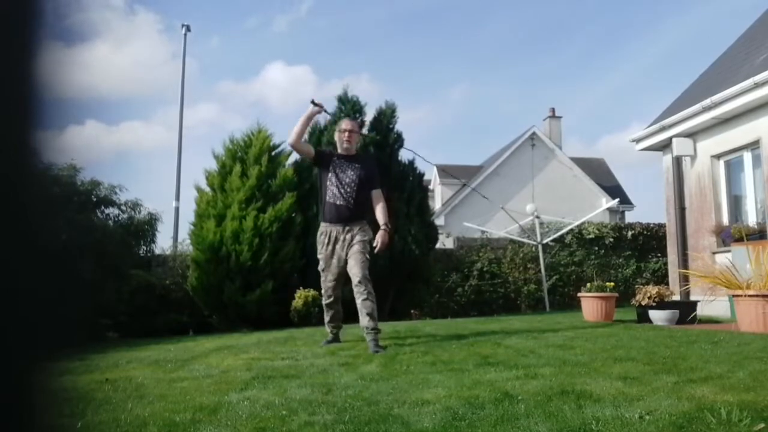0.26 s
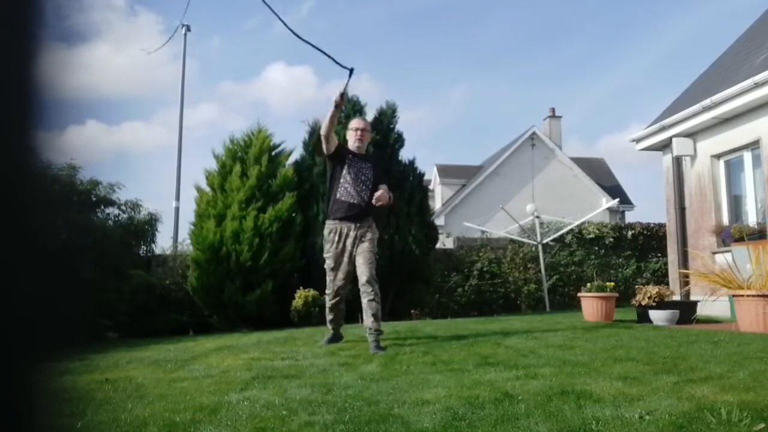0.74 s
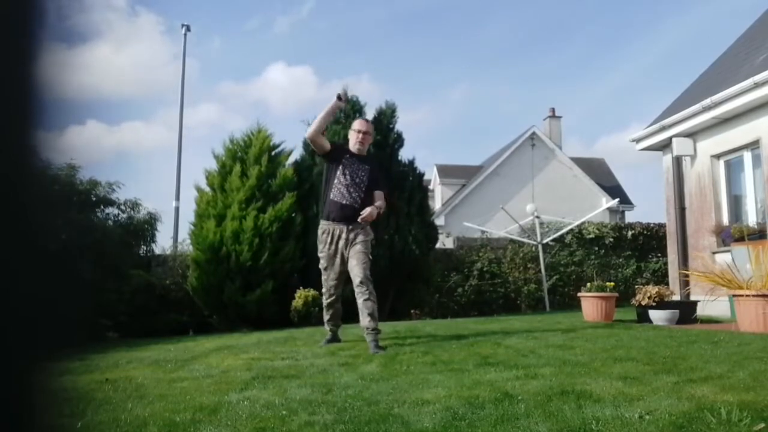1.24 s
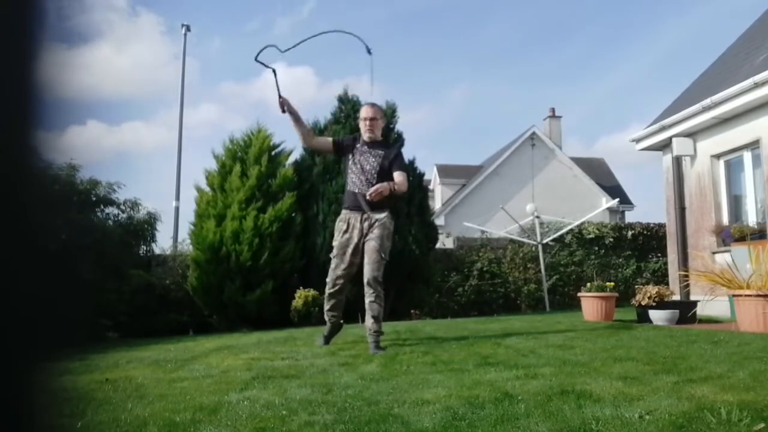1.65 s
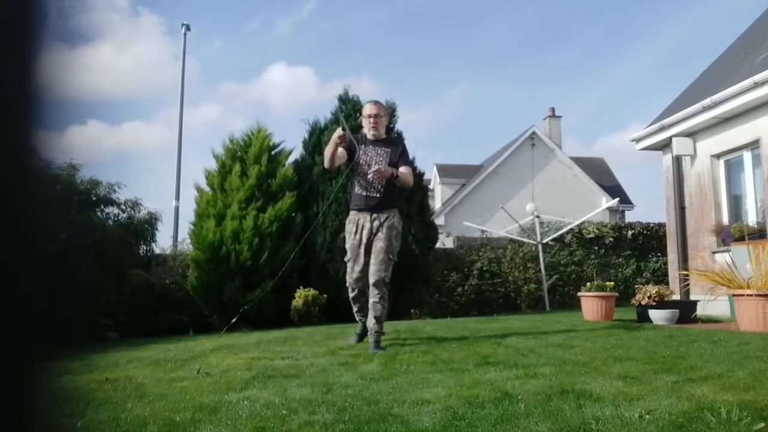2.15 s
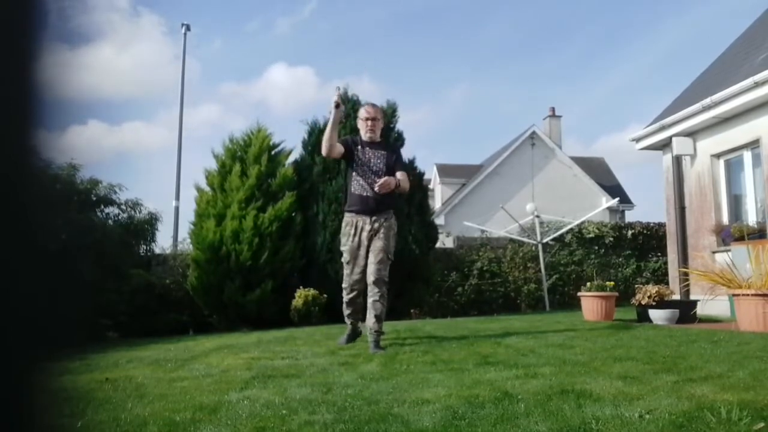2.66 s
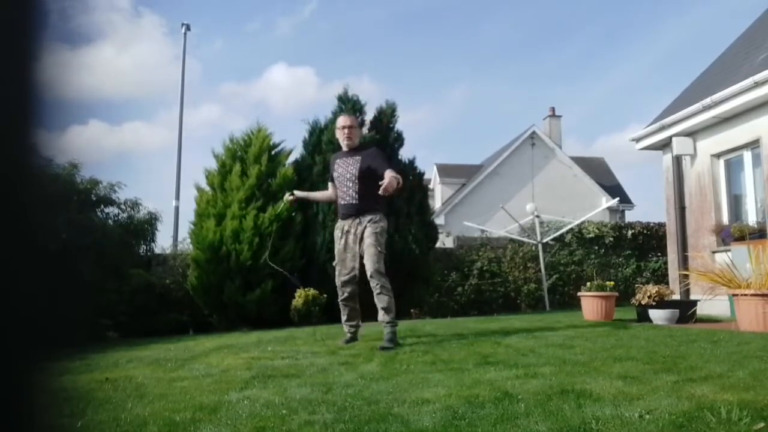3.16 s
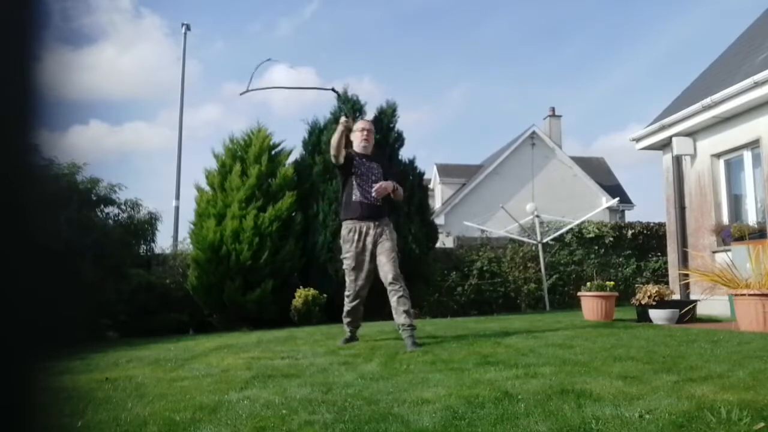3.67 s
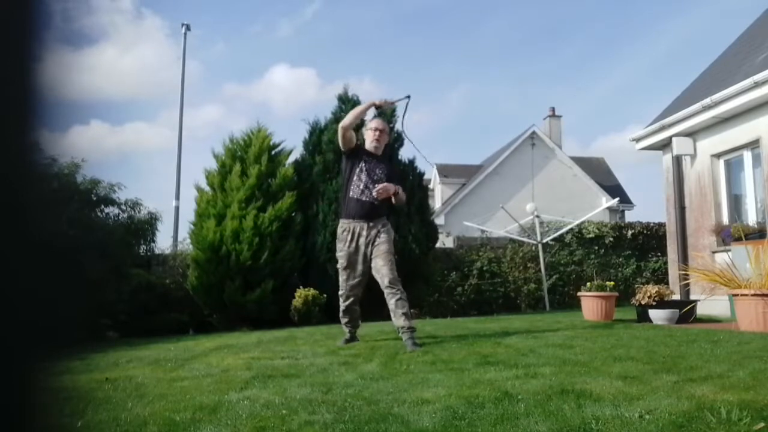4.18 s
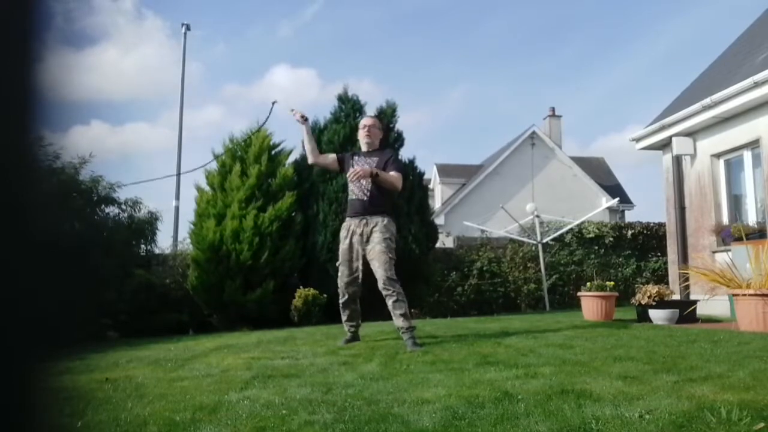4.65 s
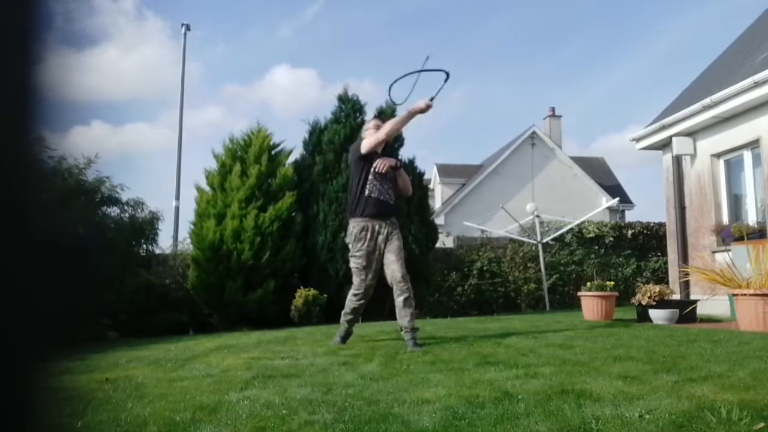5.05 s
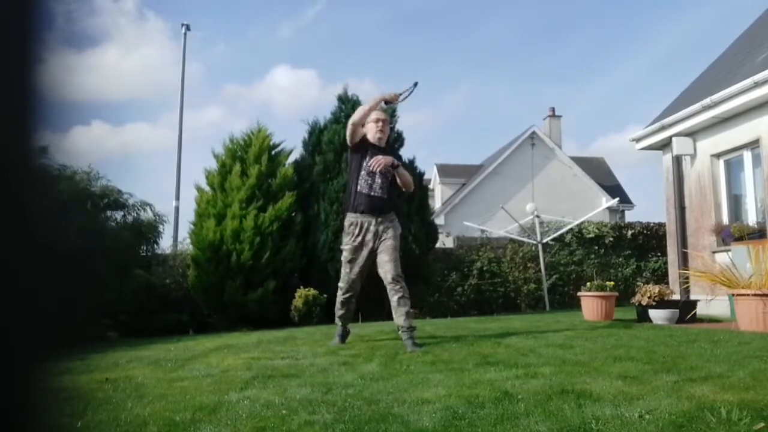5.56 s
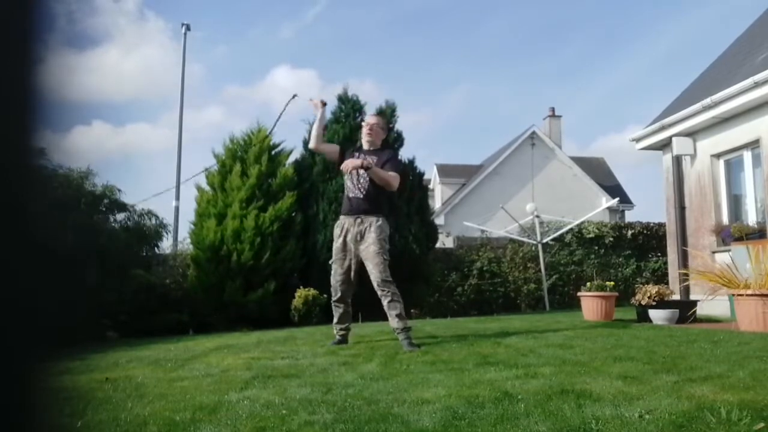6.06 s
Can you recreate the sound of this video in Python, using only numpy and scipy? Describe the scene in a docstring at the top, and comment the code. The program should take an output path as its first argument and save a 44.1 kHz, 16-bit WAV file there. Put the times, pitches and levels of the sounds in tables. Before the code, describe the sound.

A leather whip swishes and cracks sharply again and again in a garden, with slapback off house walls and low wind buffeting the microphone.

```python
"""First a faint snap of a leather whip and gusts of wind, then ever more strokes on a lawn beside a house.
Each stroke is noise that swells to the snap, then fades as the garden scatters it back; each snap is
a short shock with a flutter of noise, returned by four walls. Wind is a crowd of short pressure swings
that thump the two microphone ports. Filtered noise makes the leaves, a far drone and brief puffs;
gliding sines make the low singing of the lash and a small bird."""
import sys
import numpy as np
from scipy import signal
from scipy.fft import rfft, irfft, next_fast_len
from scipy.io import wavfile
from scipy.ndimage import uniform_filter1d, map_coordinates

SR = 44100
rng = np.random.default_rng(int(sys.argv[2]) if len(sys.argv) > 2 else 0)


def unload_wav(signal):
    """Save mono or channel-first audio to the path in sys.argv[1] as 16-bit WAV at rate SR, clipped to [-1, 1]."""
    wavfile.write(
        sys.argv[1],
        SR,
        np.round(np.clip(np.atleast_2d(signal).T, -1, 1) * 32767).astype(np.int16),
    )


N = 278446  # length in samples


def amp(db):
    """Turn dB into a plain factor."""
    return 10 ** (np.asarray(db) / 20)


def unit(x):
    """Scale each channel to an rms of 1."""
    return x / np.sqrt(np.mean(x ** 2, axis=-1, keepdims=True) + 1e-20)


def along(points, hz):
    """Read a curve of (Hz, value) points on a log-frequency axis."""
    f, v = np.transpose(points)
    return np.interp(np.log(hz + 1), np.log(f + 1), v)


def curves(rows):
    """One value per sample for each column after the time."""
    s, *columns = np.transpose(rows)
    return np.array([np.interp(np.arange(N) / SR, s, c) for c in columns])


def wobble(rate):
    """A smooth random curve for each port, with rate knots a second."""
    knots = rng.standard_normal((2, int(N * rate / SR) + 4))
    return np.array([map_coordinates(k, [np.arange(N) * rate / SR]) for k in knots])


def filtered(x, response):
    """Filter x by a response given as a function of frequency in Hz."""
    m = next_fast_len(x.shape[-1] + 8192)
    spectrum = rfft(x, m) * response(np.fft.rfftfreq(m, 1 / SR))
    return irfft(spectrum, m)[..., :x.shape[-1]]


def without_bass(x, corner_hz):
    """Weaken everything below the corner."""
    return filtered(x, lambda f: f ** 2 / (f ** 2 + corner_hz ** 2))


def bell(hz, centre_hz, octaves):
    """A bump of height 1 on the log-frequency axis."""
    return np.exp(-.5 * (np.log2((hz + 1) / centre_hz) / octaves) ** 2)


def add(track, s, piece):
    """Mix a piece in from time s; the track starts half a second early."""
    at = round((s + .5) * SR)
    track[..., at:at + piece.shape[-1]] += piece


def trimmed(track):
    """Drop the early half second and everything after the end."""
    return track[:, SR // 2:][:, :N]


# Steady far drone. Each row: pitch in Hz, width in Hz, level in dB.
HUMS = [(138.7, 75, -68.5), (223.4, 13, -67.5), (339, 6.7, -81.5)]


def drone():
    """Narrow bands of noise hum far away, each wavering a little in level."""
    total = 0
    for hz, width, db in HUMS:
        band = filtered(rng.standard_normal(N), lambda f: 1 / (1 + (2 * (f - hz) / width) ** 2))
        total = total + amp(db + 0.5 * wobble(25)[0]) * unit(band)
    return total


# Loudness of leaves and lash in the air. Each row: time in seconds, level in dB, left minus right in dB.
AIR = [(0.0, -74.5, -4.5), (0.45, -76.5, -3.5), (0.91, -67, -3), (1.07, -74.5, -2.5), (1.37, -75, -7.5),
       (1.67, -69.5, -0.5), (1.85, -76.5, 4.5), (2.24, -61.5, -8), (2.46, -78.5, -13), (2.85, -73, -5),
       (3.35, -75.5, 2.5), (4.04, -71, -1.5), (4.66, -72.5, 2), (5.36, -68.5, 1.5), (5.73, -72, 0.5),
       (6.1, -69, 7), (6.31, -74.5, -0.5)]
# Colour of that hiss. Each row: frequency in Hz, relative level in dB per Hz.
LEAF_COLOUR = [(180, -21.5), (300, -6), (580, -9), (1000, -11), (3000, -21), (4100, -23.5), (5200, -20),
               (7500, -23), (10700, -29), (13000, -33.5), (14800, -25), (16000, -36)]


def leaves():
    """Leaves and lash hiss as coloured noise, alike at both ports only in the bass."""
    air_db, pan_db = curves(AIR)

    def mid_and_side(f):
        likeness = along([(300, 0.85), (1400, 0.063), (3000, 0.019)], f)
        angle = np.arccos(likeness) / 2
        return amp(along(LEAF_COLOUR, f)) * [np.cos(angle), np.sin(angle)]

    mid, side = filtered(rng.standard_normal((2, N)), mid_and_side)
    level_db = air_db + np.outer([.5, -.5], pan_db) + .8 * wobble(8.5)
    return amp(level_db) * unit(np.array([mid + side, mid - side]))


# Single strong eddies. Each row: time in seconds, port (0 left, 1 right), strength in dB, size in ms.
THUMPS = [(0.163, 1, -27.5, 1.9), (0.25, 1, -25.5, 1.9), (0.351, 1, -18, 2), (0.503, 1, -25.5, 2.2),
          (0.598, 1, -21.5, 3.8), (0.663, 1, -18, 2.4), (0.759, 1, -19, 3.4), (0.811, 1, -22.5, 1.26),
          (0.898, 1, -27, 0.84), (1.23, 0, -25, 2.4), (1.429, 0, -26.5, 3), (1.556, 0, -33.5, 0.82),
          (1.616, 0, -21.5, 1.18), (1.669, 0, -22.5, 1.3), (1.941, 1, -17, 1.03), (1.976, 1, -16.5, 1.02),
          (2.043, 1, -13.5, 2.1), (2.11, 1, -12, 1.5), (2.264, 1, -21, 1.86), (2.375, 1, -16.5, 0.7),
          (2.458, 1, -17, 0.71), (2.496, 1, -18.5, 0.94), (2.517, 1, -16, 0.68), (2.56, 1, -10, 0.71),
          (2.614, 1, -5, 0.52), (2.629, 1, -17, 0.32), (2.661, 1, -6.5, 0.53), (2.671, 1, -5.5, 0.84),
          (2.696, 1, -3, 2.1), (2.718, 1, -8, 0.46), (2.768, 1, -21.5, 0.61), (2.81, 1, -24, 0.56),
          (2.832, 1, -18, 0.68), (2.874, 1, -18, 1.14), (2.912, 1, -5.5, 1.9), (2.957, 1, -10, 1.43),
          (3.029, 1, -15, 0.62), (3.255, 1, -30, 0.77), (3.371, 1, -22.5, 1.05), (3.501, 1, -14.5, 0.81),
          (3.588, 1, -22.5, 0.67), (3.71, 1, -24.5, 0.98), (3.799, 1, -18.5, 1.35), (4.105, 0, -19.5, 1.98),
          (4.329, 0, -20, 1.62), (4.499, 0, -11.5, 1.76), (4.811, 0, -25.5, 2.4), (5.233, 0, -28.5, 2.3),
          (5.657, 0, -25, 1.9), (5.72, 0, -29, 0.75), (5.791, 0, -28.5, 0.97), (6.007, 0, -15.5, 1.47),
          (6.267, 0, -26, 2.4)]
# Wind at the left port. Each row: time in seconds, level in dB.
WIND_LEFT = [(0.02, -76.5), (0.22, -62), (0.7, -58), (0.84, -48), (1.02, -71), (1.2, -48), (1.62, -36),
             (1.82, -53.5), (1.93, -33), (2.12, -31.5), (2.22, -61), (2.32, -44), (2.5, -51), (2.72, -35.5),
             (3.05, -51), (3.42, -41), (3.65, -49.5), (4.0, -55.5), (4.12, -31.5), (4.22, -49),
             (4.32, -35.5), (4.42, -43.5), (4.52, -29), (4.63, -41), (4.85, -39), (5.08, -66),
             (5.23, -41.5), (5.45, -60), (5.7, -30), (6.0, -38.5), (6.14, -49), (6.32, -35.5)]
# Wind at the right port. Each row: time in seconds, level in dB.
WIND_RIGHT = [(0.02, -54.5), (0.24, -36.5), (0.44, -36), (0.52, -44.5), (0.62, -36.5), (0.92, -32),
              (1.02, -56), (1.3, -51.5), (1.42, -43), (1.6, -51), (1.95, -28), (2.12, -30.5), (2.22, -47.5),
              (2.36, -27.5), (2.62, -15.5), (2.8, -26.5), (2.92, -20), (3.08, -31.5), (3.22, -33),
              (3.32, -43), (3.42, -32.5), (3.82, -36), (4.0, -50), (4.5, -61), (5.1, -63), (5.32, -47),
              (5.5, -63.5), (6.0, -57), (6.22, -45)]


def eddies(s, size_ms, gain, turn, cycles):
    """Short pressure swings, each a cosine that swells and dies, summed into one port."""
    t = np.arange(-500, 500)  # samples
    u = t / (size_ms[:, None] * SR / 1000)
    swell = gain[:, None] * np.hanning(len(t)) / np.cosh(0.98 * u)
    swing = swell * np.cos(cycles * u + turn[:, None])
    at = np.round(s * SR).astype(int)[:, None] + t + 500
    return np.bincount(at.ravel(), swing.ravel(), N + 1000)[500:][:N]


def wind():
    """Eddies tumble over each port on its own; stronger wind makes them smaller, so brighter."""
    out = np.zeros((2, N))
    level_db = np.concatenate([curves(WIND_LEFT), curves(WIND_RIGHT)])
    s, port, db, size = np.transpose(THUMPS)
    turns = rng.uniform(0, 2 * np.pi, len(s))
    rumble = unit(filtered(rng.standard_normal((2, N)), lambda f: bell(f, 86, 0.78)))
    lumps = amp(2.4 * wobble(25) + 1.5 * wobble(9))  # the tumbling comes in clusters
    for k in range(2):
        when, spread, strength, turn = rng.random((4, 4200))
        speed = amp(0.37 * (level_db[k][(when * (N - 1)).astype(int)] + 38.5))
        scale = np.clip((1.07 + 6 * spread ** 1.47) / speed, .33, 4.5)  # ms
        gain = amp(9.6 * strength) * scale ** -.3
        tumble = eddies(when * (N - 1) / SR, scale, gain, 2 * np.pi * turn, cycles=0.98)
        rumble_gain = amp(-8.0 - 0.04 * (level_db[k] + 39.5))  # its share shrinks in strong wind
        blend = unit(lumps[k] * unit(tumble) + rumble_gain * rumble[k])
        mine = np.round(port) == k
        thumps = eddies(s[mine], size[mine], amp(db[mine]), turns[mine], cycles=1.227)
        out[k] = amp(level_db[k]) * blend + thumps
    return without_bass(out, 22)


# Brief puffs of coloured noise: brushes, thuds, whistling and bodies of strokes, an echo.
# Each row: time in seconds, centre in Hz, width in octaves, length in ms, left level in dB, right level in dB.
PUFFS = [(0.689, 1090, 1.4, 5.6, -71, -70), (.76, 780, 0.74, 59, -77, -73),
         (.915, 1200, 1.9, 5.5, -66, -50), (0.931, 3010, 0.32, 3.4, -58, -33),
         (1.68, 740, 1.34, 39, -61, -65), (1.68, 5560, 1.4, 45, -72, -76),
         (1.71, 513, 0.48, 34, -55.5, -56), (1.762, 3060, 0.29, 2.2, -41, -45),
         (1.772, 507, 1.3, 4.2, -32, -25.5), (1.799, 1900, .5, 1.5, -32, -23.5),
         (2.023, 2500, 0.85, 17, -62.5, -66), (3.116, 1300, .9, 2.5, -43, -37.5),
         (3.466, 9000, 2.3, 14, -72.5, -74.5), (3.609, 2770, 0.5, 19, -69.5, -79),
         (3.924, 3300, 2.7, 9.5, -50.5, -53), (3.945, 6360, 0.29, 3.2, -32.5, -46),
         (4.47, 2100, 0.63, 17, -69, -70.5), (4.697, 980, 2.2, 3.4, -48, -58),
         (5.298, 600, 1.07, 2.4, -25.5, -36)]


def puffs():
    """Brief puffs of coloured noise swell and fade, partly alike at both ports."""
    out = np.zeros((2, N + 2 * SR))
    t = np.arange(-SR // 4, SR // 4) / SR
    for s, hz, octaves, ms, left_db, right_db in PUFFS:
        noise = rng.standard_normal((2, len(t))) + 1.3 * rng.standard_normal(len(t))
        puff = unit(filtered(noise, lambda f: bell(f, hz, octaves / 2)))
        envelope = np.exp(-.5 * (t / (ms / 1000)) ** 2)
        add(out, s - 1 / 4, amp([[left_db], [right_db]]) * puff * envelope)
    return trimmed(out)


# Gliding tones, the lash singing low and the bird high. Each row: start in seconds, length in seconds,
# first, middle and last pitch in Hz, left level in dB, right level in dB.
TONES = [(4.394, 0.045, 707, 600, 559, -57, -54.5), (4.456, 0.057, 776, 756, 720, -62.5, -56.5),
         (4.907, 0.028, 6800, 6880, 6860, -77, -84), (5.097, 0.038, 7250, 7270, 7300, -73, -84),
         (5.505, 0.03, 6900, 7030, 6900, -78, -83.5), (5.79, 0.037, 6400, 6800, 6300, -75, -83),
         (5.817, 0.026, 6300, 6550, 7360, -76, -82)]


def gliding_tones():
    """The lash and the bird sound as thin sines that bend through three pitches."""
    out = np.zeros((2, N + 2 * SR))
    for s, length, first, middle, last, left_db, right_db in TONES:
        u = np.linspace(0, 1, round(length * SR))
        # a parabola through the three pitches
        pitch = first * (1 - u) * (1 - 2 * u) + 4 * middle * u * (1 - u) + last * u * (2 * u - 1)
        pitch = pitch + 1800 * uniform_filter1d(rng.standard_normal(len(u)), size=300)  # unsteady in the wind
        envelope = np.sqrt(np.sin(np.pi * u) ** 2)
        tone = envelope * np.sin(2 * np.pi * np.cumsum(pitch) / SR)
        add(out, s, amp([[left_db], [right_db]]) * tone)
    return trimmed(out)


# Strokes of the lash. Each row: time of the snap in seconds, rise in ms per 20 dB, hold in ms,
# left and right level in dB, bass in dB, left and right ring in dB, top in dB, tail stretch as a factor.
STROKES = [(-.02, 20, 3.7, -43, -39, -13, 3, 3.5, -3.5, 1.04),
           (0.928, 28, 2.4, -39, -32.5, -2.5, 1.5, 0.5, -3.5, 0.86),
           (1.772, 24, 8.7, -31, -29.5, 1.5, 0.5, -7, -6, 0.93),
           (2.119, 6, 29, -40.5, -31, -11, -1.5, -1.5, -15, 1.15),
           (2.341, 33, 3.2, -45, -42, 7.5, -0.5, 3.5, 1, 1.21),
           (3.098, 14.5, 21.2, -38, -36, -9.5, -9.5, -9, -9.5, 1.29),
           (3.939, 12.5, 18, -34.5, -35, -3, 3, 1, -6.5, 0.97),
           (4.637, 4.5, 31.4, -41.5, -45, -10.5, 1.5, 4, 1.5, 1),
           (5.297, 11, 12.3, -32.5, -32, -8.5, 1, -5, -5.5, 0.95),
           (6.012, 9, 30.6, -32, -36.5, -10, -7, -14, -13, 1.19)]
# Fading of the garden before the tail stretch. Each row: frequency in Hz, time to fall 60 dB in seconds.
GARDEN = [(400, 0.32), (1000, 0.29), (2800, .34), (7000, 0.22), (14000, 0.18)]
# Microphone colour, also heard in the snaps. Each row: frequency in Hz, gain in dB.
PORTS = [(200, -4.5), (600, 10.5), (1500, 0.5), (3000, -3), (4000, -7), (5200, -2), (8000, -5),
         (11000, -7.5), (13000, -14), (14800, -7), (16000, -22.5)]
RING_HZ, RING_WIDTH_HZ = 6800, 1400  # pitch that some strokes favour
# Late answer of farther houses: level under the stroke, time to fall 60 dB, favoured pitch.
FAR_DB, FAR_T60_S, FAR_HZ = -20.5, .6, 2200


def strokes():
    """The lash hisses ever louder up to the snap; the garden scatters it back, treble dying first."""
    out = np.zeros((2, N + 2 * SR))
    for s, rise, hold, left_db, right_db, bass_db, ring_l_db, ring_r_db, top_db, stretch in STROKES:
        hz, t, z = signal.stft(rng.standard_normal((2, SR * 3 // 4)), SR, nperseg=128)
        t = t - 1 / 4  # the snap is at 0
        t60 = stretch * along(GARDEN, hz)[:, None]
        rise_db = 20 * np.minimum(t, 0) / (rise / 1000)
        shape_db = rise_db - 60 * np.maximum(t - hold / 1000, 0) / t60
        tilt_db = along([(900, bass_db), (2000, 0), (8000, 0.0083), (11000, top_db)], hz)
        ring_shape = np.exp(-.5 * ((hz - RING_HZ) / RING_WIDTH_HZ) ** 2)
        ring_db = np.array([[ring_l_db], [ring_r_db]]) * ring_shape
        far = amp(FAR_DB - 60 * t / FAR_T60_S) * (t > hold / 1000) * bell(hz, FAR_HZ, 1.1)[:, None]
        # the noise is uneven, in random patches of time and pitch
        patches = uniform_filter1d(rng.standard_normal(z.shape), size=3, axis=1)
        patches = uniform_filter1d(patches, size=3, axis=2)
        clumps_db = 3 * unit(patches) + 1.3 * rng.standard_normal((2, 1, len(t)))
        # lower tones reach both ports more alike
        shared = along([(600, 0.28), (1500, 0.13), (4000, 0.041)], hz)[:, None]
        z[1] = np.sqrt(shared) * z[0] + np.sqrt(1 - shared) * z[1]
        colour_db = along(PORTS, hz) + tilt_db + ring_db + np.array([[left_db], [right_db]])
        z = z * amp(colour_db[..., None] + clumps_db) * np.hypot(amp(shape_db), far)
        add(out, s - 1 / 4, without_bass(signal.istft(z, SR, nperseg=128)[1], 330))
    return trimmed(out)


# Snaps of the tip and their strongest single echoes. Each row: time in seconds,
# left and right shock level in dB, lag of the left in ms, shock width in ms, flutter in dB, echo in dB.
CRACKS = [(0.0096, -35.5, -35.5, -0.082, 0.068, 9.5, -6), (0.9166, -36, -31, -0.067, 0.17, 10, -6),
          (0.9315, -22.5, -14, -0.019, 0.052, -8.5, -1), (0.9419, -19.5, -19.5, 0.14, 0.12, 0, -14),
          (0.9528, -25, -12.5, 0.23, 0.047, -21, -24), (1.7623, -17, -27, 0.17, 0.16, -7, 0),
          (1.772, -28.5, -25.5, 0.13, 0.085, 13, -6), (1.798, -32, -25.5, 0.051, 0.23, -6, 6),
          (2.0027, -41, -36.5, 0.1, 0.077, -27, -2), (2.121, -13.5, -6.5, -0.071, 0.046, -9.5, -3),
          (2.1449, -27.5, -17, 0.23, 0.091, 4, 4), (2.2117, -32, -24, -0.21, 0.064, -17, -7),
          (2.3415, -16.5, -9.5, -0.26, 0.074, -6, -8), (3.1, -2, -0.5, -0.04, 0.1, -8, -4),
          (3.4142, -53, -61, 0.001, 0.034, -1, -9), (3.939, -16.5, -35, 0.075, 0.045, -4, -5),
          (3.944, -24.5, -35, 0.34, 0.048, 4, -6), (3.948, -24.5, -28, -0.15, 0.12, 3, 10),
          (4.6384, -14.5, -17.5, -0.12, 0.037, -4, 0), (4.693, -26.5, -36, -0.31, 0.073, -13, -11),
          (5.3, -21, -29, -0.029, 0.041, 5.5, -12), (5.5525, -56, -56, .01, 0.066, 2.5, -9),
          (5.9397, -43.5, -46, -0.15, 0.046, -0.5, 9), (6.0098, -28, -48.5, -0.017, 0.053, -25, -16),
          (6.0305, -10.5, -18.5, 0.3, 0.17, 6, -2), (6.0421, -14, -10, 0.22, 0.093, -25, -10),
          (6.1118, -25.5, -55, -0.11, 0.062, -21, -14), (6.1206, -30, -28.5, 0.007, 0.067, -23, -11)]
# Walls that return every row above, the house on the right first. Each row: delay in seconds,
# left and right gain in dB, lag of the left in ms, flutter in dB.
WALLS = [(0.013, -26, -14.5, 0.0076, 4), (0.0287, -27, -22.5, .1, -3.3), (.054, -27, -32, -.1, -15),
         (.083, -27, -25.5, -0.11, -35)]
ECHO_WIDTH_MS = 0.058
FLUTTER_ALIKE = .6  # share of the flutter power that both ports hear alike


def echoes():
    """Every wall returns every row of CRACKS, weaker than the louder side of it."""
    rows = []
    for s, left_db, right_db, *_, echo_db in CRACKS:
        level_db = max(left_db, right_db) + echo_db
        for delay, wall_l_db, wall_r_db, lag, flutter_db in WALLS:
            rows.append((s + delay, level_db + wall_l_db, level_db + wall_r_db, lag, ECHO_WIDTH_MS, flutter_db))
    return rows


def cracks():
    """Each snap or echo is a short shock, push then pull, in a flutter of the frayed tip."""
    out, t = np.zeros((2, N + SR)), np.arange(-300, 500) / SR
    for s, left_db, right_db, lag, width, flutter_db in [row[:-1] for row in CRACKS] + echoes():
        u = (t - np.array([[lag], [-lag]]) / 2000) / (width / 1000)  # time in shock widths
        push = np.exp(-np.where(u < 0, .6, 2.5) * u ** 2)
        pull = .5 * np.exp(-1.2 * (u - 1.3) ** 2) + 0.15 * np.exp(-.15 * (u - 3.5) ** 2)
        shock = without_bass(push - pull, 4 / width ** 2)  # a narrow shock carries little bass
        both, own = rng.standard_normal(len(t)), rng.standard_normal(u.shape)
        noise = np.sqrt(FLUTTER_ALIKE) * both + np.sqrt(1 - FLUTTER_ALIKE) * own
        swell = np.where(t < 0, amp(20 * t / .0013), amp(-20 * t / .0024))
        flutter = filtered(noise * swell, lambda f: amp(along(PORTS, f)) * (bell(f, 300 / width, 1.0) + 0.1))
        add(out, s - 300 / SR, amp([[left_db], [right_db]]) * (shock + amp(flutter_db) * flutter))
    return trimmed(out)


def scene():
    """All layers together, from the background to the snaps."""
    return drone() + leaves() + wind() + puffs() + gliding_tones() + strokes() + cracks()


# Cavities in front of the left, then the right microphone. Each row: pitch in Hz, width in Hz,
# gain as a factor (below 0 makes a dip).
CAVITIES = [
    [(6984, 770, 3), (8150, 1800, -0.66), (3940, 560, -0.25)],
    [(8500, 980, 1.3), (6300, 180, -0.34), (4150, 810, -0.65)],
]
TOP_HZ = 16100  # band limit


def record(dry):
    """Port cavities ring, the input rounds off the loudest peaks, and a steep filter removes the top."""
    def resonance(f, centre, width, gain):
        return 1 + gain * 1j * f * width / (centre * centre - f * f + 1j * f * width)

    def cavity(f):
        return [np.prod([resonance(f, *row) for row in port], axis=0) for port in CAVITIES]

    x = filtered(dry, cavity)
    x = x / (1 + np.abs(x / .95) ** 6) ** (1 / 6)
    return filtered(x, lambda f: 1 / (1 + (f / TOP_HZ) ** 120))


dry = scene()
out = record(dry)
unload_wav(out)
```